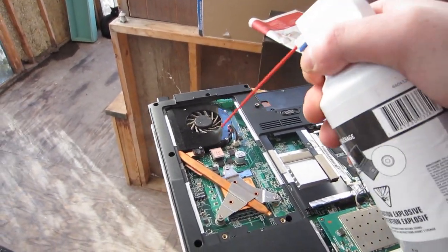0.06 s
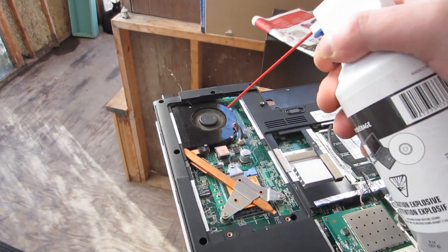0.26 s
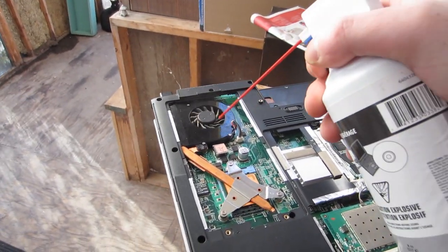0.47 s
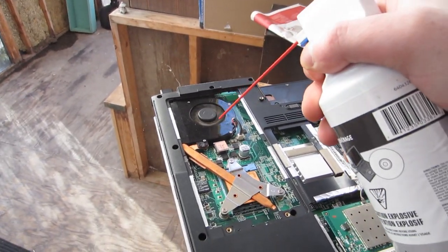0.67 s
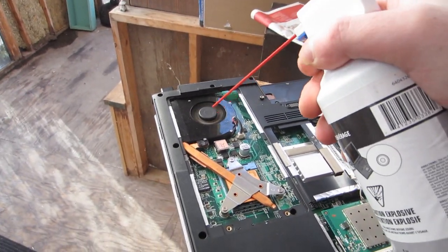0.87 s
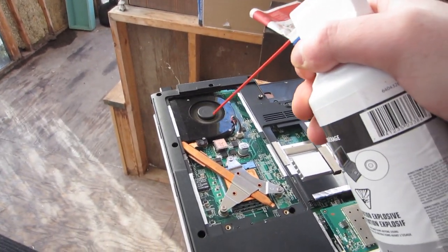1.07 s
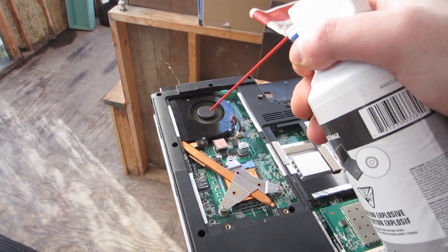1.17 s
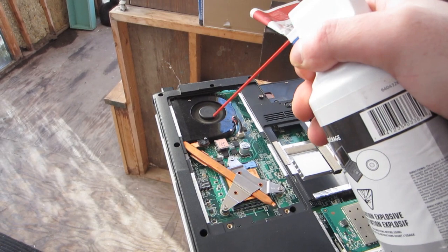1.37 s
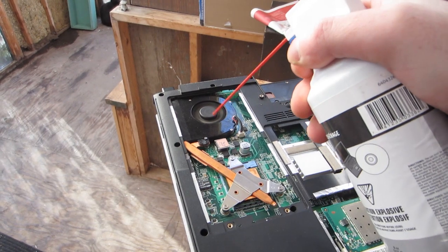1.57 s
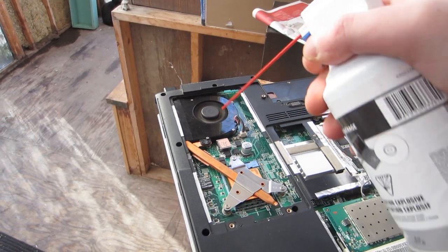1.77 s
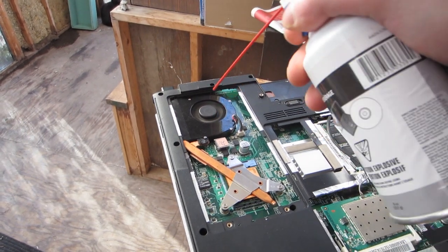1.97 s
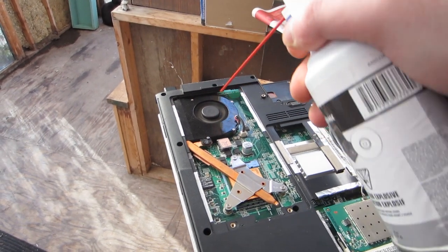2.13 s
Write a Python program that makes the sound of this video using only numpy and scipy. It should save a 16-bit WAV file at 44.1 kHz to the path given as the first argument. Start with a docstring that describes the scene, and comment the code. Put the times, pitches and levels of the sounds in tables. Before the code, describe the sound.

Compressed air hisses from a can in six short, close bursts over quiet outdoor air. A faint hand rub and plastic trigger clack come first, then bursts at about 0.2, 0.5, 0.8, 1.1, 1.4 and 1.7 seconds. Stray air softly buffets the microphone, most around 1 second. From 0.8 seconds a laptop fan whines, rising in pitch, strongest from 1.5 seconds, and fading by 2 seconds with slight reverberation.

```python
"""Over quiet outdoor air, a hand rubs on a can of compressed air and its plastic trigger clacks.
Six short bursts follow, blown through a straw into the cooling fan of an open laptop: turbulent hiss,
coloured by the resonances of the housing. From the second burst on, stray air buffets the microphones.
From the third, the blades spin up and chop the jet into a rising siren whine, which lingers briefly
after the last burst and dies away in the short reverberation of nearby walls."""
import sys
import numpy as np
from scipy import signal
from scipy.fft import rfft, irfft, next_fast_len
from scipy.io import wavfile

SR = 44100
rng = np.random.default_rng(int(sys.argv[2]) if len(sys.argv) > 2 else 0)


def generate_wav(sig):
    """Save sig (samples, or channels by samples) to the path in sys.argv[1] as 16-bit PCM at SR."""
    pcm = np.round(np.clip(np.atleast_2d(sig).T, -1, 1) * 32767).astype(np.int16)
    wavfile.write(sys.argv[1], SR, pcm)


N = 97020
T = np.arange(N) / SR
SIZE = next_fast_len(2 * N)
HZ = np.arange(SIZE // 2 + 1) * SR / SIZE


def undb(db):
    """Amplitude ratio of a level in decibels."""
    return 10 ** (np.asarray(db) / 20)


def unit(x):
    """Normalisation to rms 1."""
    return x / np.sqrt(np.mean(x ** 2))


def over_hz(points, column=1):
    """Interpolation of a table column in log frequency."""
    p = np.array(points, float)
    return np.interp(np.log(HZ + 1), np.log(p[:, 0]), p[:, column])


def over_time(points, column=1):
    """Linear interpolation of a table column in time."""
    p = np.array(points, float)
    return np.interp(T, p[:, 0], p[:, column])


def shape(x, gain):
    """Filtering by multiplication of the spectrum."""
    return irfft(rfft(x, SIZE) * gain, SIZE)[..., :N]


def lowpass(edge_hz, order):
    """Low-pass response, at half amplitude on the edge."""
    return 1 / (1 + (HZ / edge_hz) ** order)


def resonance(hz, width_hz):
    """Lorentzian resonance curve of height 1."""
    return 1 / (1 + (2 * (HZ - hz) / width_hz) ** 2)


def noise(gain):
    """Filtered Gaussian noise of rms 1."""
    return unit(shape(rng.standard_normal(N), gain))


def wander(rate_hz):
    """Band-limited random fluctuation of rms 1."""
    return noise(lowpass(rate_hz, 4))


# Spectrum of the outdoor air (frequency [Hz], relative level [dB])
AIR_SPECTRUM = [(20, -12), (70, -1), (170, -2), (1500, -14), (4000, -31), (8000, -43), (12000, -60)]
def outdoor_air(level_db=-58):
    """Ambient noise: stationary, strongest at low frequencies."""
    return undb(level_db) * noise(undb(over_hz(AIR_SPECTRUM)))


# Envelope of the rubbing (time [s], level [dB])
RUB_ENVELOPE = [(0, -64), (.04, -52), (.14, -48.5), (.22, -42), (.26, -83)]
# Spectrum of the rubbing (frequency [Hz], relative level [dB])
RUB_SPECTRUM = [(100, -17), (350, -1.5), (600, -7.5), (900, -3.5), (1300, -13), (1850, -1), (2200, -13.5),
                (3000, -13.5), (4200, -23), (8000, -28.5), (11000, -56)]
def rubbing():
    """Friction noise: the hand shifts on the can to aim it."""
    return undb(over_time(RUB_ENVELOPE)) * noise(undb(over_hz(RUB_SPECTRUM)))


# Impacts of the trigger (time [s], gain [dB])
CLACKS = [(0.1628, -35.5), (0.172, -36.5), (0.195, -44)]
# Modes of the trigger (frequency [Hz], relative level [dB], 60 dB decay time [s])
TRIGGER_MODES = [(280, 4.5, 0.064), (1125, 1.5, 0.082), (1340, 2.5, 0.04), (1600, 1, .04), (1970, -3, .035),
                 (2330, -9, 0.022), (2780, -17, .03), (3600, -19, .015)]
def trigger(crack_db=12.5, crack_s=.007):
    """Impact excitation: the plastic takes up its slack with a crack and rings in damped modes."""
    clacks = 0
    for start, db in CLACKS:
        age = np.maximum(T - start, 0)
        ring = sum(undb(mode_db - 60 * age / t60) * np.sin(2 * np.pi * hz * age)
                   for hz, mode_db, t60 in TRIGGER_MODES)
        crack = undb(crack_db) * rng.standard_normal(N) * np.exp(-age / crack_s)
        clacks = clacks + undb(db) * (T > start) * (ring + crack)
    return shape(clacks, lowpass(3300, 8) - lowpass(172, 8))


def valve(opens, shuts, attack, release_s=.014):
    """Flow envelope: a smooth rise, a hold and an exponential decay."""
    rise = np.sin(np.pi / 2 * np.clip((T - opens) / attack, 0, 1)) ** 2
    return rise * np.exp(-np.maximum(T - shuts, 0) / release_s)


# Bursts of air (valve opens [s], valve shuts [s], level [dB], treble gain [dB],
# swell over the burst [dB], mid-burst bulge [dB], attack [s], cavity ring [dB])
BURSTS = [(0.211, 0.388, -17.5, -3.5, 8.5, 1.5, 0.026, -8.5), (0.543, 0.693, -15, -3, -3.5, 3.5, 0.038, -9),
          (0.791, 1, -16.5, -0.9, 0.5, 2, 0.034, -40), (1.12, 1.347, -17, 0.5, -3.5, 1.5, 0.036, -19.5),
          (1.436, 1.61, -18, 1, -4, 3, 0.037, -13), (1.735, 1.917, -18, 1.5, 1.5, -1, 0.038, -34.5)]
# Colour that the aim of the straw gives each burst (high ring [dB], top sizzle [dB])
AIMS = [(4, -1.5), (4, 0.5), (2, 2.5), (1.5, -0.5), (2.5, 0), (-0.5, 0.5)]
# Spectrum of the jet (frequency [Hz], relative level [dB])
JET_SPECTRUM = [(100, -40), (300, -19.5), (600, -13.5), (950, -4), (2200, -3), (4000, -2), (8500, -2),
                (10500, -10.5), (11900, -18.5), (13500, -11), (15800, -8.5)]
# Resonances of the fan housing (frequency [Hz], width [Hz], gain [dB])
HOUSING_MODES = [(1245, 140, -4.5), (1584, 310, 4.5), (2155, 250, 7), (2480, 360, 6), (2825, 170, -3),
                 (3175, 400, 4), (4620, 200, -2.5), (4840, 250, 3), (7050, 200, 2), (9630, 210, 0)]
def jet(lag_s=.0038, treble_rise_db=2, flutter_db=.46, sputter_db=.7):
    """Turbulence: the straw's jet radiates broadband noise, filtered by the resonant housing."""
    colour_db = over_hz(JET_SPECTRUM) + sum(db * resonance(hz, width) for hz, width, db in HOUSING_MODES)
    high_ring, sizzle = resonance(6040, 340), 1 - lowpass(12700, 8)
    cavity = noise(resonance(2950, 1220))
    out = 0
    for burst, (ring_db, sizzle_db) in zip(BURSTS, AIMS):
        opens, shuts, db, treble_db, swell_db, bulge_db, attack, cavity_db = burst
        hiss = noise(undb(colour_db + ring_db * high_ring + sizzle_db * sizzle))
        body = shape(hiss, lowpass(3600, 4))
        along = np.clip((T - opens) / (shuts - opens), 0, 1) - .5
        arch = np.cos(np.pi * along) ** 2
        treble = valve(opens, shuts, attack) * undb(treble_db + treble_rise_db * along) * (hiss - body)
        # the housing fills and empties a little after the straw
        filling = valve(opens, shuts + lag_s, attack + 2 * lag_s)
        low = filling * (body + undb(cavity_db) * arch * cavity)
        out = out + undb(db + swell_db * along + bulge_db * (arch - .5)) * (treble + low)
    return out * undb(flutter_db * wander(42) + sputter_db * wander(450))


# Puffs of stray air (time [s], half width [s], gain [dB], upper edge [Hz])
GUSTS = [(.588, .025, -42, 300), (.92, .03, -42, 100), (.978, .014, -31, 260), (1.005, .03, -26.5, 110),
         (1.065, .035, -43, 110), (1.55, .14, -44, 120), (1.59, .03, -36, 120)]
# Bass roll-off of the puffs (frequency [Hz], relative level [dB])
GUST_SPECTRUM = [(20, -22), (55, -1), (100, 0)]
def buffets(uncorrelated_db=-8):
    """Wind noise: stray air makes the pressure at the two microphones fluctuate, mostly in antiphase."""
    out = 0
    for at, width, db, edge_hz in GUSTS:
        colour = undb(over_hz(GUST_SPECTRUM)) * lowpass(edge_hz, 3)
        common = noise(colour)
        pair = np.array([weight * common + undb(uncorrelated_db) * noise(colour) for weight in (.7, -1.3)])
        out = out + undb(db) * np.exp(-((T - at) / width) ** 2) * pair
    return out


# Whine of the fan, one table for each of the last four bursts
# (time [s], blade-passing frequency [Hz], base levels of harmonics 1, 2, 3 [dB])
FAN_TRACKS = [
    [(.815, 148.3, -55.5, -46, -57), (.89, 207.4, -45.5, -46.5, -41), (.95, 295.1, -43.5, -41, -35.5),
     (.98, 347.8, -61, -48, -64)],
    [(1.145, 473.2, -45.5, -29.5, -46), (1.183, 512.2, -54, -23, -29), (1.215, 500.5, -36, -24.5, -41),
     (1.25, 555.7, -33, -25.5, -31), (1.287, 600.6, -37, -37, -59), (1.308, 687.6, -61, -57, -58),
     (1.335, 815, -32, -49, -41)],
    [(1.455, 813, -36, -29, -27), (1.478, 799.4, -20.5, -28, -29), (1.497, 799, -32, -22, -23.5),
     (1.518, 826.5, -23, -42, -21), (1.538, 848, -16.5, -23.5, -35.5), (1.605, 941, -27, -38, -36),
     (1.65, 915, -25, -52, -49), (1.69, 890, -46, -58, -56)],
    [(1.755, 830, -31.5, -21, -42), (1.775, 862, -19, -27.5, -39), (1.798, 873.8, -21.5, -29, -39),
     (1.81, 856, -42.5, -25.5, -41), (1.823, 864, -22, -23.5, -46.5), (1.85, 833.6, -20.5, -28, -55.5),
     (1.88, 836, -23, -33, -38), (1.907, 868, -41, -34, -41), (1.922, 872, -22.5, -30.5, -43),
     (1.945, 862.4, -30.5, -43, -46), (1.98, 857, -24.5, -41, -45)],
]
def fan(lifts_db=(.5, .5, 3.5), jitter=.00975, roughness_db=2.5, coast_db=-8, coast_s=.06):
    """Siren principle: the blades chop the jet, giving harmonics of the blade-passing frequency."""
    rows = [row for track in FAN_TRACKS for row in track]
    blade_hz = over_time(rows) * (1 + jitter * wander(60))
    phase = 2 * np.pi * np.cumsum(blade_hz) / SR
    whine = 0
    for track, (opens, shuts, *_, attack, _) in zip(FAN_TRACKS, BURSTS[-len(FAN_TRACKS):]):
        coast = (T > shuts) * undb(coast_db) * np.exp(-np.maximum(T - shuts, 0) / coast_s)
        drive = np.maximum(valve(opens, shuts, attack), coast)
        for k, lift_db in enumerate(lifts_db, 1):
            rms = drive ** k * undb(over_time(track, k + 1) + lift_db)  # overtones need a stronger jet
            whine = whine + np.sqrt(2) * rms * np.sin(k * phase)
    return whine * undb(roughness_db * wander(70))


def diffuse_decay(t60_s, delay_s=.012):
    """Diffuse reflection: the spectrum of exponentially decaying noise of unit energy."""
    impulse = rng.standard_normal(N) * (T > delay_s) * undb(-60 * T / t60_s)
    return rfft(impulse / np.sqrt(np.sum(impulse ** 2)), SIZE)


# Scatter from the laptop and bench (frequency [Hz], relative level [dB])
SCATTER_SPECTRUM = [(200, 19), (900, 14), (2500, 2), (5500, 1), (10000, 12.5), (12000, -14), (16000, -8)]
# Reflection from the walls (frequency [Hz], relative level [dB])
WALL_SPECTRUM = [(100, 11), (800, -5.5), (1900, 0.5), (2400, -2), (8000, -5.5), (11000, -7.5),
                 (15000, -14.5)]
def reflections(scatter_db=-17, wall_db=-9):
    """Reverberation as a frequency response: close scatter, then a tail whose treble dies first."""
    low = lowpass(7000, 2)
    tail = np.sqrt(low) * diffuse_decay(t60_s=.37) + np.sqrt(1 - low) * diffuse_decay(t60_s=.26)
    scatter = diffuse_decay(t60_s=.0536, delay_s=.00268) * undb(scatter_db + over_hz(SCATTER_SPECTRUM))
    return scatter + tail * undb(wall_db + over_hz(WALL_SPECTRUM))


# Microphone pair (frequency [Hz], left minus right level [dB], phase lead of the left [rad])
MIC_DIFFERENCES = [(100, -3.5, -0.32), (400, -6, -0.28), (1050, -5.5, 0.064), (1400, -3.5, 0.15),
                   (2480, -2, 0.38), (4900, 0.5, 0.7), (6050, 2.5, 0.73), (7200, 2.5, 0.74),
                   (8700, 4.5, -0.13), (10500, 2.5, -0.14), (12000, 0.5, 0), (15900, 1, 0)]
def microphone(side):
    """Stereo by level and phase difference at constant total power; side is 1 (left) or -1 (right)."""
    balance_db, lead = over_hz(MIC_DIFFERENCES), over_hz(MIC_DIFFERENCES, column=2)
    mean_power = np.cosh(balance_db * np.log(10) / 20)
    return undb(side * balance_db / 2) * np.exp(.5j * side * lead) / np.sqrt(mean_power)


# Hiss in antiphase between left and right (frequency [Hz], gain [dB])
JET_SPREAD = [(100, -19.5), (900, -17.5), (2200, -22), (4000, -24), (5500, -23), (10000, -11), (12000, -17),
              (15500, -12)]
def scene(apart=.7):
    """Superposition at two microphones: direct sound, partly correlated reflections, air and wind."""
    source = jet() + fan() + trigger() + rubbing()
    shared = np.sqrt(1 - apart ** 2) * reflections()
    spread = shape(jet(), undb(over_hz(JET_SPREAD)))
    channels = []
    for side in (1, -1):
        mic = microphone(side)
        paths = 1 + shared + apart * reflections()
        channels.append(shape(source, mic * paths) + side * shape(spread, mic) + outdoor_air())
    return np.array(channels) + buffets()


def record(dry):
    """Band limiting: an elliptic low-pass cuts steeply above 15.7 kHz."""
    return signal.sosfilt(signal.ellip(10, .2, 80, 15700, fs=SR, output="sos"), dry)


dry = scene()
out = record(dry)
generate_wav(out)
```